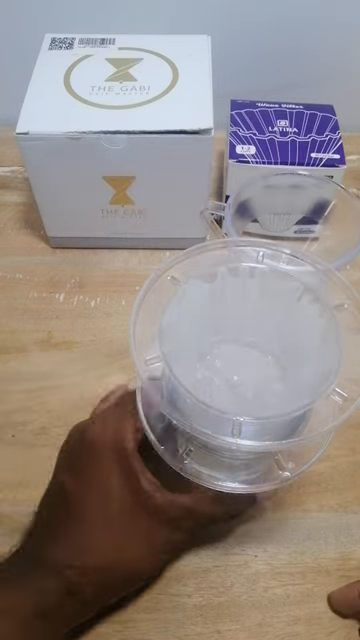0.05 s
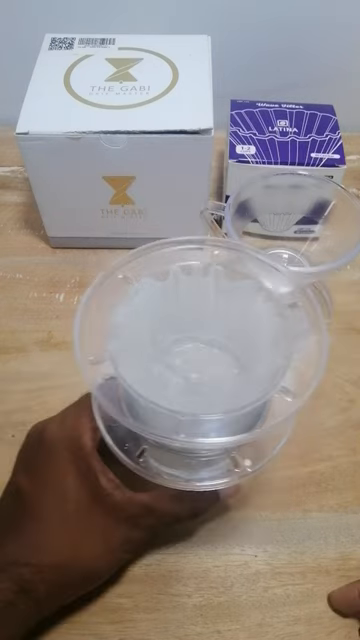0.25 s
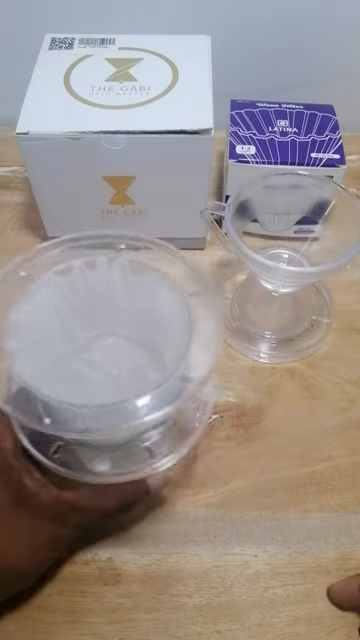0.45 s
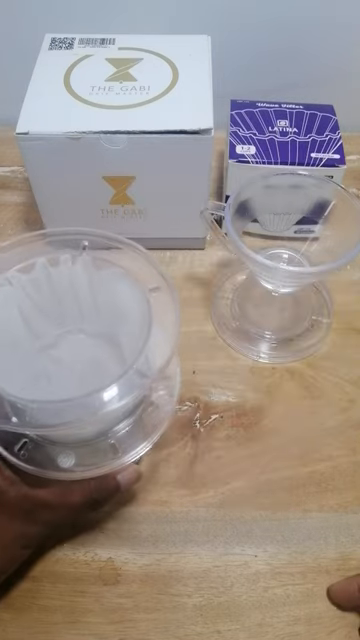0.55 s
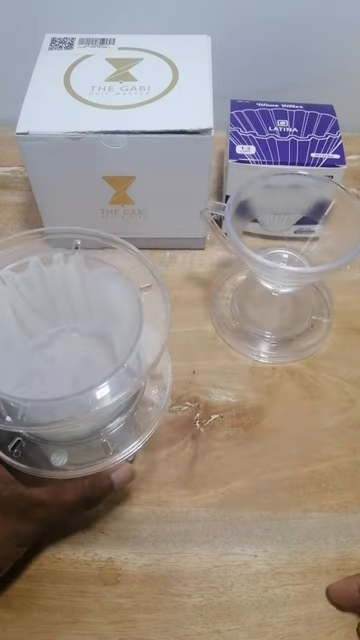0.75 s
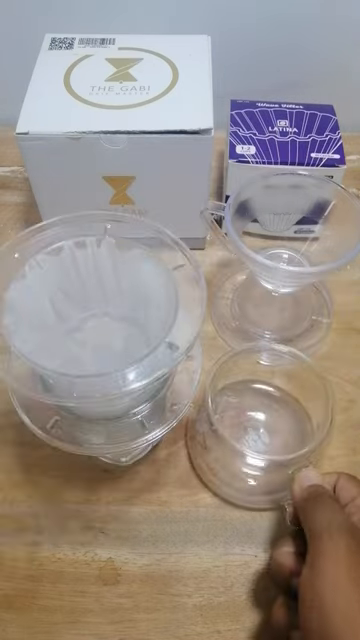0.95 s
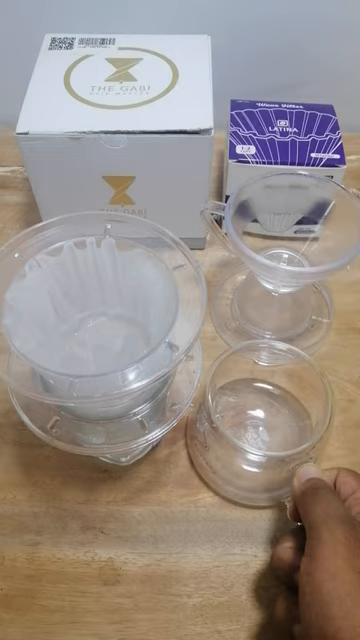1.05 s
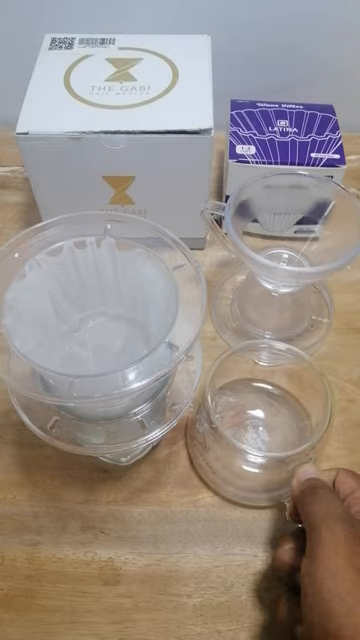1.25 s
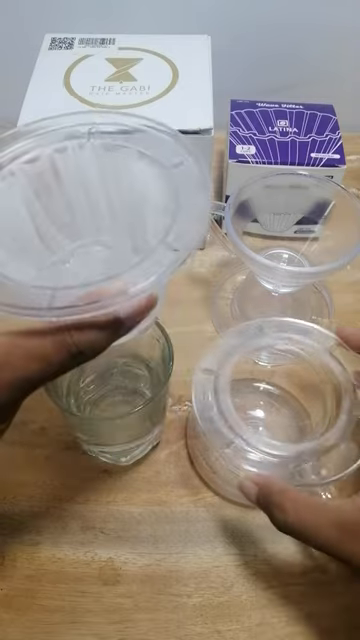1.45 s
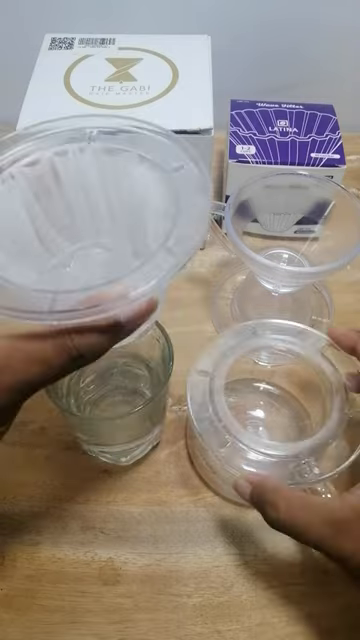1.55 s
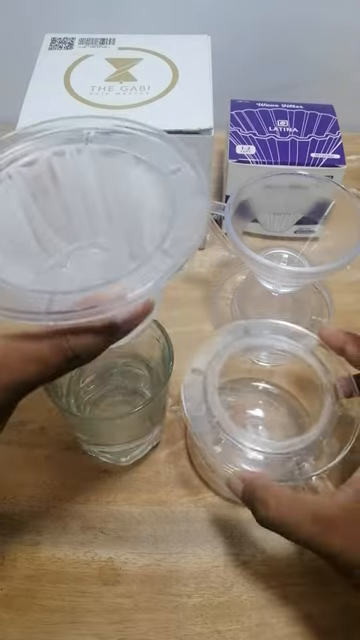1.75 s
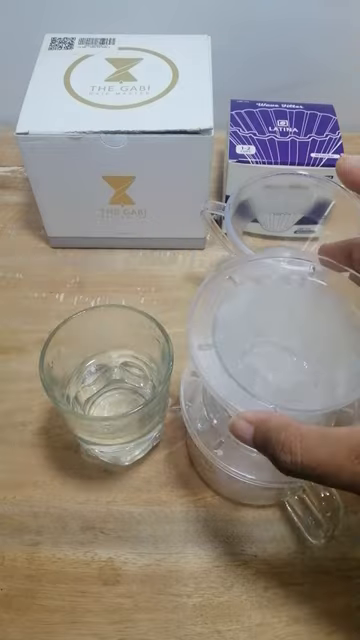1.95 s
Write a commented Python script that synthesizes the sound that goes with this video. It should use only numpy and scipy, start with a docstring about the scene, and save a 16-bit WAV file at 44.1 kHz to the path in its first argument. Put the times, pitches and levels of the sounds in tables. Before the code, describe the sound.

Close up in a small, hard-walled room, a glass rumbles and stutters over a wooden tabletop, then lands with a thud. A finger squeaks faintly, and a plastic piece clinks and rattles onto a glass pot, which shifts slightly.

```python
"""Glass and dripper on a wooden table

A glass carrying a plastic dripper is gripped with a faint tick, dragged over a table in stick-slip
and set down with a thud. A finger squeaks faintly on the rim. A plastic ring clinks onto
a glass server, which shifts as the ring is pressed home. Close stereo, small hard-walled room."""
import sys
import numpy as np
from scipy import signal
from scipy.fft import rfft, irfft, next_fast_len
from scipy.io import wavfile
from scipy.ndimage import map_coordinates

SR = 44100
rng = np.random.default_rng(int(sys.argv[2]) if len(sys.argv) > 2 else 0)


def put_to_file(sound):
    """Save the sound as 16-bit audio at rate SR, in the file named by the first command-line argument."""
    columns = np.atleast_2d(sound).T  # one column per channel
    safe = np.clip(columns, -1, 1)
    whole_steps = np.round(safe * 32767)
    wavfile.write(sys.argv[1], SR, whole_steps.astype(np.int16))


N = 88200
TIME_S = np.arange(N) / SR
TAIL_S = np.arange(SR * 5 // 9) / SR  # time axis of one decay
HALF_LR = np.array([[.5], [-.5]])  # splits a left-minus-right difference
CONTACT_RISE_S = 0.00024

# low resonances of the table and the room (frequency [Hz], level [dB], t60 [s])
TABLE_AND_ROOM_MODES = [(71, -11.5, 0.21), (106.1, -9.5, 0.24), (135.5, -15.5, 0.31), (168.6, -14, 0.24),
                        (218.7, -17, 0.94), (308.6, 0, 0.28), (376.4, -2, 0.14), (422.7, -8, 0.15),
                        (501.2, -9, 0.12), (573, -8, 0.25), (653.5, -12.5, .25), (696, -14.5, 0.18),
                        (777.4, -15.5, 0.3), (895, -24.5, 0.089), (1039, -15, 0.11)]
# short wood modes under a hard blow (frequency [Hz], level [dB], t60 [s])
KNOCK_MODES = [(391.6, -0.5, .042), (579, -6.5, 0.034), (725, -11, 0.031)]
# hard contact spectrum (frequency [Hz], level [dB])
TICK_SPECTRUM = [(400, 2.5), (1000, -10), (1600, 5.5), (2500, -16), (3600, 0.5), (4400, -7.5), (5500, 0),
                 (7000, -0.5), (9000, -11.5), (10500, -7), (12200, -7.5), (15000, -19)]
# wood grit spectrum (frequency [Hz], level [dB])
GRIT_SPECTRUM = [(400, -4.5), (1500, -2.5), (2700, 4.5), (5500, -10), (9000, -16.5), (12000, -28),
                 (15000, -38)]
# stereo balance at the dragged glass (frequency [Hz], left minus right [dB])
GLASS_PAN = [(100, -2), (200, 3), (400, -8.5), (700, -9.5), (1300, -6), (4400, -7.5), (8000, -9.5),
             (14000, 3.5)]
# stereo balance at the server (frequency [Hz], left minus right [dB])
SERVER_PAN = [(150, -3.5), (500, -8), (1600, -5), (2800, -9.5), (3700, 3), (5400, -11.5), (6400, -10.5),
              (8500, -19), (10500, -11), (14000, 5)]


def amp(db):
    """dB to gain."""
    return 10 ** (np.asarray(db) / 20)


def unit_rms(x):
    """Scale to rms 1."""
    return x / np.sqrt(np.mean(x ** 2) + 1e-20)


def unit_hit(x):
    """Scale to the energy of 10 ms at rms 1."""
    return x / np.sqrt(np.sum(x ** 2) / (SR / 100) + 1e-20)


def at_hz(points, hz):
    """Interpolate (frequency [Hz], value) points on a log axis."""
    knots_hz, values = np.transpose(points)
    return np.interp(np.log(hz + 1), np.log(knots_hz + 1), values)


def envelopes(rows):
    """Gain per sample for each dB column; silent outside the rows."""
    times_s, *columns_db = np.transpose(rows)
    return [amp(np.interp(TIME_S, times_s, db, left=-140, right=-140)) for db in columns_db]


def wobble(knots_per_s):
    """Smooth random curve."""
    return map_coordinates(rng.standard_normal(N // 8), [TIME_S * knots_per_s])


def filtered(x, response):
    """Apply response(hz) by FFT."""
    size = next_fast_len(x.shape[-1] + SR // 4)
    return irfft(rfft(x, size) * response(np.fft.rfftfreq(size, 1 / SR)), size)[..., :x.shape[-1]]


def colour(x, spectrum, size=8192):
    """Minimum-phase filter from the folded cepstrum."""
    cepstrum = irfft(np.log(amp(at_hz(spectrum, np.fft.rfftfreq(size, 1 / SR)))))
    cepstrum[1:size // 2] *= 2
    cepstrum[size // 2 + 1:] = 0
    return signal.fftconvolve(x, irfft(np.exp(rfft(cepstrum))))[:len(x)]


def decay(t60_s, time_s=TAIL_S):
    """Exponential decay."""
    return 1000.0 ** (-time_s / t60_s)


def add(track, start_s, sound):
    """Mix in place."""
    part = track[round(start_s * SR):][:len(sound)]
    part += sound[:len(part)]


def diffuse_noise(samples):
    """Diffuse field at two microphones: alike in the bass, independent in the treble."""
    # (frequency [Hz], left-right coherence [ratio])
    coherence = [(100, 0.91), (300, 0.82), (600, 0.42), (1100, .05), (8000, 0.018)]

    def mid_side_gains(hz):
        angle = np.arccos(np.clip(at_hz(coherence, hz), -1, 1)) / 2
        return np.array([np.cos(angle), np.sin(angle)])

    mid, side = filtered(rng.standard_normal((2, samples)), mid_side_gains)
    return np.array([mid + side, mid - side]) * amp(-1.5 * HALF_LR)


def in_room(x, pan, lag_ms, wet_db):
    """Panned direct sound, later on the left, plus a diffuse tail."""
    # room decay (frequency [Hz], t60 [s])
    room_t60 = [(80, 0.43), (220, 0.66), (350, 0.46), (1000, 0.5), (3000, 0.45), (7000, 0.47),
                (14000, 0.31)]
    build_s = 0.007
    delay_s = HALF_LR * lag_ms / 1000
    direct = filtered(x, lambda hz: amp(HALF_LR * at_hz(pan, hz)) * np.exp(-2j * np.pi * hz * delay_s))
    bands_hz, frames_s, bands = signal.stft(diffuse_noise(len(TAIL_S)), SR, nperseg=256)
    bands *= decay(at_hz(room_t60, bands_hz)[:, None], frames_s)
    tail = signal.istft(bands, SR)[1][:, :len(TAIL_S)]
    tail *= 1 - np.exp(-(TAIL_S / build_s) ** 2)
    tail /= np.sqrt(np.sum(tail ** 2) / 2)
    return direct + amp(wet_db) * signal.fftconvolve(x[None], tail, axes=1)[:, :N]


def struck(modes, scatter_db=1):
    """Damped modes of alternating sign; levels vary per strike."""
    return unit_hit(sum(
        (-1) ** k * amp(db + scatter_db * rng.normal()) * decay(t60_s) * np.sin(2 * np.pi * hz * TAIL_S)
        for k, (hz, db, t60_s) in enumerate(modes)))


def contact(spectrum, t60_s, push):
    """Dying burst of micro-contacts plus one impulse of weight push."""
    burst = rng.standard_normal(len(TAIL_S)) * decay(t60_s)
    whitened = irfft(np.exp(1j * np.angle(rfft(burst))), len(TAIL_S))
    crunch = whitened * decay(4 * t60_s) * (1 - np.exp(-TAIL_S / CONTACT_RISE_S))
    impulse = signal.unit_impulse(len(TAIL_S))
    return unit_hit(colour(unit_hit(crunch) + push * unit_hit(impulse), spectrum))


def slips(rate_per_s=2400, spread_db=3.5):
    """Friction as tiny random impulses."""
    impulses = (rng.random(N) < rate_per_s / SR) * rng.choice([-1, 1], N)
    return impulses * amp(spread_db * rng.standard_normal(N))


def sliding(hiss_spectrum):
    """Slips under uneven pressure: resonant rumble and contact hiss, each at rms 1."""
    force = slips() * amp(1.1 * wobble(54.8))
    rumble = signal.fftconvolve(force, struck(TABLE_AND_ROOM_MODES))[:N]
    load_detune = 1 + .022 * wobble(12)  # the moving load shifts the rumble's pitch
    rumble = map_coordinates(rumble, [np.cumsum(load_detune)], mode="mirror")
    # (frequency [Hz], level [dB])
    rumble_spectrum = [(40, -38), (90, -13.5), (160, 0.5), (220, 4), (310, -9.5), (400, -2.5), (550, 2),
                       (650, -3), (800, -4.5), (1500, -22), (4000, -37.5)]
    hiss = unit_rms(force) + .5 * rng.standard_normal(N)
    return unit_rms(colour(rumble, rumble_spectrum)), unit_rms(colour(hiss, hiss_spectrum))


def judder(bursts, hz, octave_db, grit_db):
    """Regular stick-slip: wavering hum, its octave and a puff of grit per cycle."""
    phase = 2 * np.pi * np.cumsum(hz * (1 + .0352 * wobble(70))) / SR
    gain = sum(amp(db) * np.exp(-((TIME_S - mid_s) / half_s) ** 2) for mid_s, half_s, db in bursts)
    hum = unit_rms(np.sin(phase) + amp(octave_db) * np.sin(2 * phase))
    puffs = rng.standard_normal(N) * np.maximum(np.sin(phase), 0) ** 2
    grit = unit_rms(colour(puffs, GRIT_SPECTRUM))
    return gain * (hum + amp(grit_db) * grit)


def room_air():
    """Low rumble and hiss of the quiet room."""
    # (frequency [Hz], level [dB])
    air_spectrum = [(20, -4.5), (45, -6), (62, -12), (82, 5), (115, -7.5), (200, -15.5), (400, -22),
                    (1000, -25), (3000, -29), (7000, -39.5), (14000, -49)]
    air = filtered(diffuse_noise(N), lambda hz: amp(at_hz(air_spectrum, hz)))
    return amp(-57.5) * unit_rms(air)


def squeak():
    """Finger on the rim: unsteady, slowly rising stick-slip tone over a faint rub."""
    # (time [s], tone [dB], rub [dB])
    squeak_levels = [(1.365, -100, -93), (1.385, -81, -70), (1.405, -70.5, -77), (1.46, -70, -82),
                     (1.54, -72.5, -79.5), (1.555, -92, -84), (1.6, -102, -74)]
    start_hz, rise_hz_per_s = 3240, 250
    tone_gain, rub_gain = envelopes(squeak_levels)
    elapsed_s = TIME_S - squeak_levels[0][0]
    hz = (start_hz + rise_hz_per_s * elapsed_s) * (1 + .018 * wobble(300))
    tone = unit_rms(np.sin(2 * np.pi * np.cumsum(hz) / SR) * amp(4.2 * wobble(77)))
    rub = unit_rms(colour(slips(), TICK_SPECTRUM))
    return (in_room(tone_gain * tone, GLASS_PAN, lag_ms=0.063, wet_db=0.5)
            + in_room(rub_gain * rub, GLASS_PAN, lag_ms=0.057, wet_db=4.5))


def grip():
    """The hand bumps the table softly as it takes the glass."""
    # (time [s], level [dB])
    bumps = [(.047, -40.5), (.061, -44.5)]
    # (frequency [Hz], level [dB])
    palm_spectrum = [(25, -19), (70, 7), (115, 7), (190, -0.5), (350, -34), (1800, -26), (4000, -78),
                     (12000, -82)]
    track = np.zeros(N)
    for start_s, db in bumps:
        add(track, start_s, amp(db) * contact(palm_spectrum, t60_s=0.018, push=2.1))
    return in_room(track, GLASS_PAN, lag_ms=0.16, wet_db=-15)


def grain_snags():
    """Wood grain catches the base of the dragged glass."""
    # (time [s], level [dB])
    snags = [(0.245, -56), (0.258, -48.5), (.293, -45.5), (0.299, -51), (.314, -54), (.345, -47),
             (.353, -42), (0.4113, -43), (0.5, -44)]
    track = np.zeros(N)
    for start_s, db in snags:
        add(track, start_s, amp(db) * contact(GRIT_SPECTRUM, t60_s=0.022, push=0.19))
    return in_room(track, GLASS_PAN, lag_ms=0.18, wet_db=-2.5)


def nudge():
    """The server judders and starts to slide as the ring is pressed home."""
    # (time [s], rumble [dB], hiss [dB])
    slide_levels = [(1.96, -80, -78), (1.964, -61, -56), (1.977, -53, -43.5), (1.99, -47, -49.5),
                    (2.0, -39.5, -44)]
    # (frequency [Hz], level [dB])
    hiss_spectrum = [(300, -1), (1000, 11.5), (1400, 5), (2100, 6), (3100, 2.5), (4200, -10.5), (5600, 3.5),
                     (7300, -8), (10000, -28), (15000, -39)]
    # stick-slip bursts (centre [s], half-length [s], level [dB])
    bursts = [(1.98, 0.0095, -40)]
    rumble_gain, hiss_gain = envelopes(slide_levels)
    rumble, hiss = sliding(hiss_spectrum)
    groan = judder(bursts, hz=295, octave_db=0.5, grit_db=-16)
    return in_room(rumble_gain * rumble + hiss_gain * hiss + groan, SERVER_PAN, lag_ms=0.4, wet_db=-7)


def drag():
    """The glass rumbles, hisses and judders across the wood."""
    # (time [s], relative rumble [dB], relative hiss [dB])
    slide_levels = [(.115, -103, -103), (.138, -47.5, -60.5), (.18, -45.5, -57), (.26, -36.5, -48.5),
                    (.35, -37, -45.5), (.395, -37.5, -49), (.46, -31, -42), (.55, -32, -46),
                    (.615, -29.5, -47.5), (.68, -67.5, -66.5), (.75, -76.5, -86), (.85, -72.5, -104)]
    # (frequency [Hz], level [dB])
    hiss_spectrum = [(150, -23), (500, 3.5), (900, 4), (1150, 0), (1500, 3.5), (2400, -2.5), (4000, -15.5),
                     (6000, -17.5), (9500, -25.5), (12000, -28.5), (15000, -47)]
    # stick-slip bursts (centre [s], half-length [s], level [dB])
    bursts = [(0.265, 0.012, -33), (.313, 0.0085, -30), (0.357, 0.016, -27.5), (0.464, 0.023, -30.5),
              (.605, 0.012, -31.5)]
    rumble_gain, hiss_gain = envelopes(slide_levels)
    rumble, hiss = sliding(hiss_spectrum)
    slide = amp(-2) * rumble_gain * rumble + amp(5) * hiss_gain * hiss
    stereo_slide = in_room(slide, GLASS_PAN, lag_ms=0.22, wet_db=-1)
    groan = judder(bursts, hz=226, octave_db=-11, grit_db=-21)
    return stereo_slide + in_room(groan, GLASS_PAN, lag_ms=0.059, wet_db=-9)


def clinks():
    """A faint finger tick as the glass is gripped, then plastic clinking on glass; both parts ring."""
    # (time [s], tick [dB], plastic [dB], glass [dB], knock [dB], low-pass [Hz],
    #  pitch of the struck spot [ratio], ring time left by the fingers [ratio])
    touches = [(0.038, -54.5, -66, -82, -70, 1890, 1.9, 0.35),
               (0.1441, -55, -57.5, -59.5, -70, 14900, 0.54, 0.36),
               (1.609, -31, -31, -49, -39, 11900, 0.99, 0.93),
               (1.6128, -34.5, -40, -54, -67, 10000, 0.86, .2), (1.6262, -37.5, -35, -45, -54, 11000, 1, 1),
               (1.677, -42.5, -50, -56, -50, 8900, 1, 0.5),
               (1.703, -54, -42, -48.5, -45.5, 4970, 1.02, 0.42),
               (1.757, -43.5, -47, -66, -43.5, 7400, 1.05, .25),
               (1.7609, -46, -54, -39.5, -36.5, 3430, 0.975, 0.68),
               (1.8648, -66, -45, -46, -44, 3230, 1.05, 0.45),
               (1.869, -46.5, -56, -46.5, -41.5, 5970, 1.85, 0.08),
               (1.872, -49, -38, -41.5, -55, 3560, 1.04, 0.082),
               (1.964, -48, -51.5, -58, -62, 4450, 1.02, 0.35)]
    # plastic ring (frequency [Hz], level [dB], t60 [s])
    plastic_modes = [(1400, -5, .03), (1600, -9.5, .11), (2875, -5.5, .19), (2955, -9, .07),
                     (3575, -6.5, .09), (4835, -19, .1), (5300, -3, .03), (5415, -5.5, .14),
                     (6643, -11, .07), (7008, -4, .08), (8380, 4, .03), (8650, 3, .02), (9000, 4, .022),
                     (9781, -13, .06), (12000, -15, .04)]
    # glass server (frequency [Hz], level [dB], t60 [s])
    glass_modes = [(2305, -2, 0.42), (2342, 9, 0.05), (2170, 4, 0.04), (5421, -12, .5), (5950, -12, .12),
                   (6400, -16, 0.3)]
    # noise of the knock on the table (frequency [Hz], level [dB])
    clack_spectrum = [(40, -44), (150, -4), (280, 1.5), (450, -3), (700, -3.5), (1000, -15.5), (1700, -9.5),
                      (3000, -12.5), (8000, -32)]
    twin_spread = 0.026  # an out-of-round ring splits each mode
    attack = 1 - np.exp(-TAIL_S / CONTACT_RISE_S)
    hits, tones, knocks = np.zeros((3, N))
    for start_s, tick_db, plastic_db, glass_db, knock_db, cutoff_hz, pitch, free in touches:
        spot = [(hz * pitch, db, t60_s * free) for hz, db, t60_s in plastic_modes]
        twins = [(hz * (1 + twin_spread * rng.normal()), db, t60_s / 2) for hz, db, t60_s in spot]
        plastic = struck(spot + twins, scatter_db=2.7) * attack
        glass = struck([(hz, db, t60_s * free) for hz, db, t60_s in glass_modes], scatter_db=0.5)
        tick = amp(tick_db) * contact(TICK_SPECTRUM, t60_s=0.025, push=0.029)
        clack = amp(knock_db - 3.5) * contact(clack_spectrum, t60_s=0.043, push=0.2)
        knock = struck([(hz * pitch, db, t60_s) for hz, db, t60_s in KNOCK_MODES], scatter_db=2.3)
        knock += amp(-10) * struck(TABLE_AND_ROOM_MODES)
        soften = signal.butter(2, cutoff_hz, fs=SR)  # soft contacts are duller
        add(hits, start_s, signal.lfilter(*soften, tick + clack))
        add(tones, start_s, signal.lfilter(*soften, amp(plastic_db) * plastic + amp(glass_db) * glass))
        add(knocks, start_s, amp(knock_db) * knock)
    return (in_room(hits, SERVER_PAN, lag_ms=0.067, wet_db=-1.5)
            + in_room(tones, SERVER_PAN, lag_ms=0.052, wet_db=-7)
            + in_room(knocks, SERVER_PAN, lag_ms=0.43, wet_db=-9.5))


def set_down():
    """The glass lands edge first, then flat; table and room resonate."""
    # (frequency [Hz], level [dB])
    thud_spectrum = [(28, -40.5), (48, -19), (72, -4), (110, -2), (170, -2.5), (240, -8), (350, -7),
                     (620, -1.5), (780, -7), (930, -15.5), (1330, -17.5), (1550, -27.5), (2500, -28),
                     (3200, -33), (4000, -36), (7000, -48.5), (10000, -58.5), (15000, -72.5)]
    land_s, rock_s = .8778, .0045
    thud, ringing = np.zeros((2, N))
    add(thud, land_s, amp(-20.5) * contact(thud_spectrum, t60_s=0.083, push=0.18))
    add(thud, land_s + rock_s, amp(-29.5) * contact(thud_spectrum, t60_s=0.026, push=0.52))
    add(ringing, land_s, amp(-21) * struck(TABLE_AND_ROOM_MODES))
    add(ringing, land_s + 0.00043, amp(-24) * struck(KNOCK_MODES))
    return (in_room(thud, GLASS_PAN, lag_ms=0.53, wet_db=-0.5)
            + in_room(ringing, GLASS_PAN, lag_ms=0.34, wet_db=-10))


def scene():
    """Stereo sum of all sources."""
    return grip() + drag() + grain_snags() + set_down() + squeak() + clinks() + nudge() + room_air()


def record(dry):
    """Brief fade-in, microphone response and band limit."""
    # (frequency [Hz], gain [dB])
    mic_response = [(20, -2.5), (45, -1.5), (70, 0.5), (13500, -3.5), (14700, -2.5), (15500, -17.5)]
    fade_s, top_hz = .06, 15500
    fade_in = amp(np.interp(TIME_S, [0, fade_s], [-12, 0]))
    return filtered(dry * fade_in, lambda hz: amp(at_hz(mic_response, hz)) * (hz < top_hz))


dry = scene()
out = record(dry)
put_to_file(out)
```